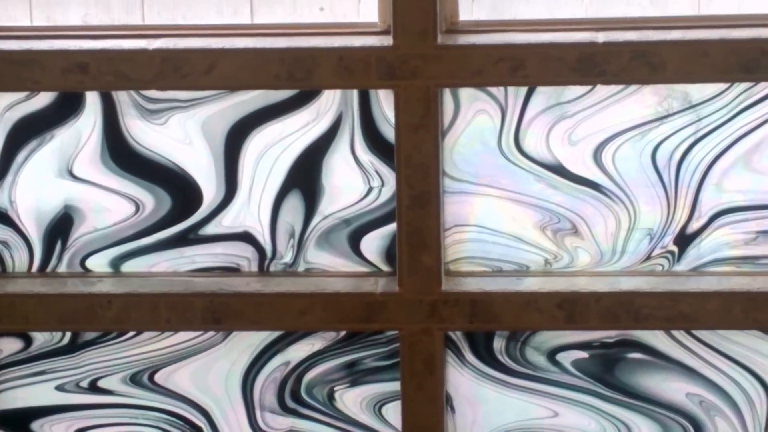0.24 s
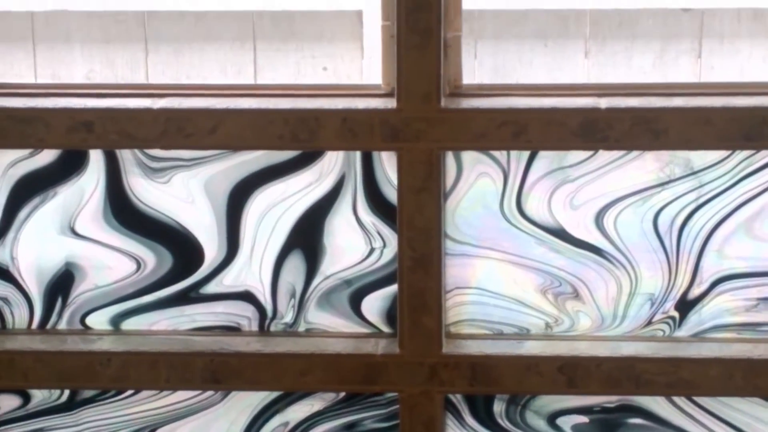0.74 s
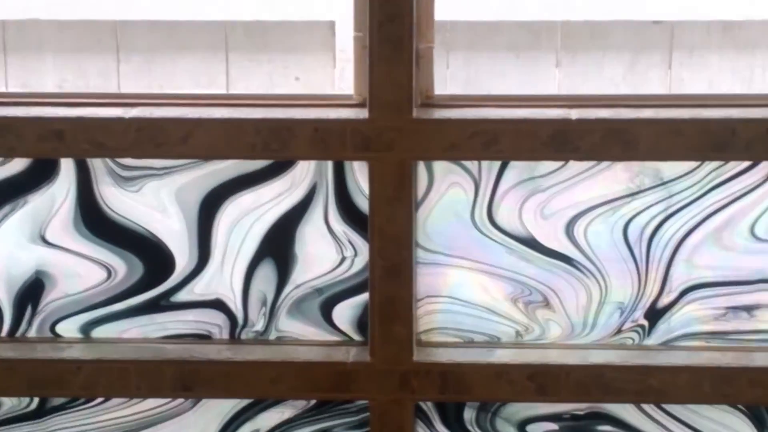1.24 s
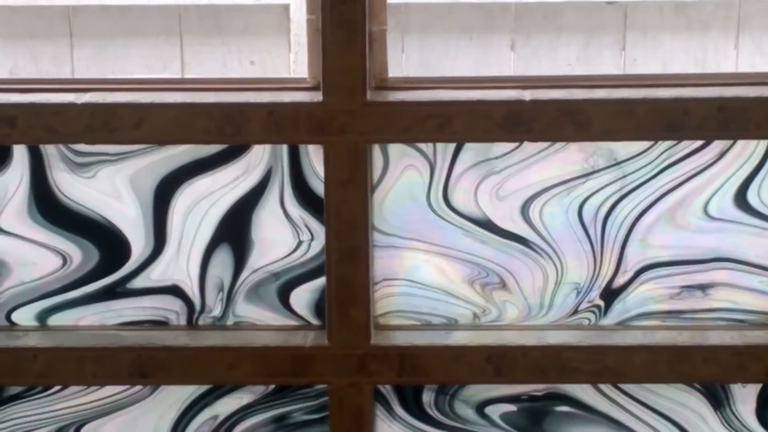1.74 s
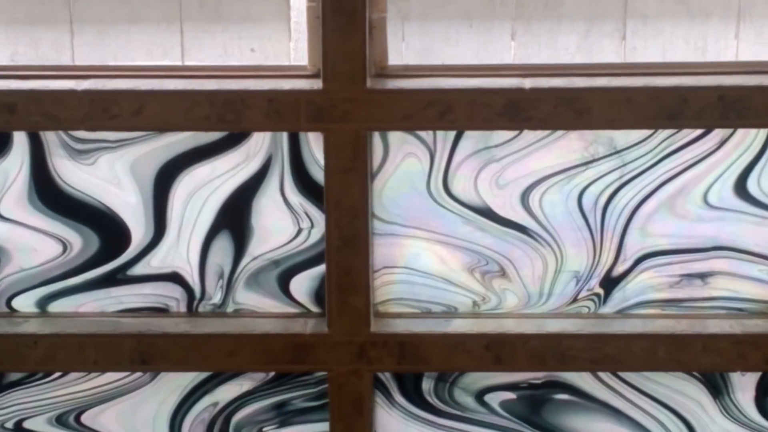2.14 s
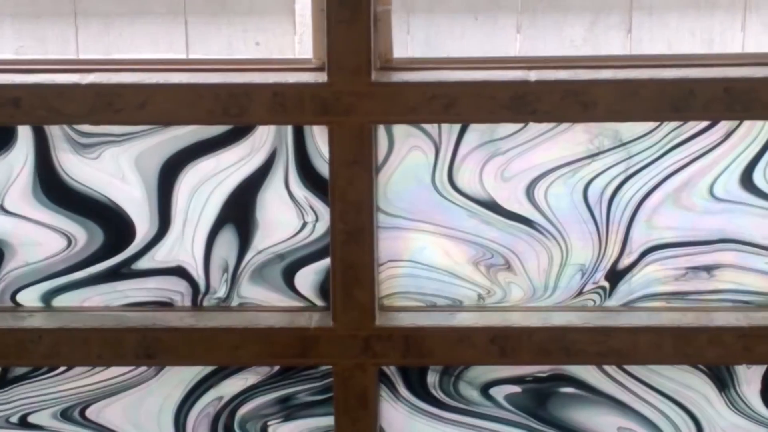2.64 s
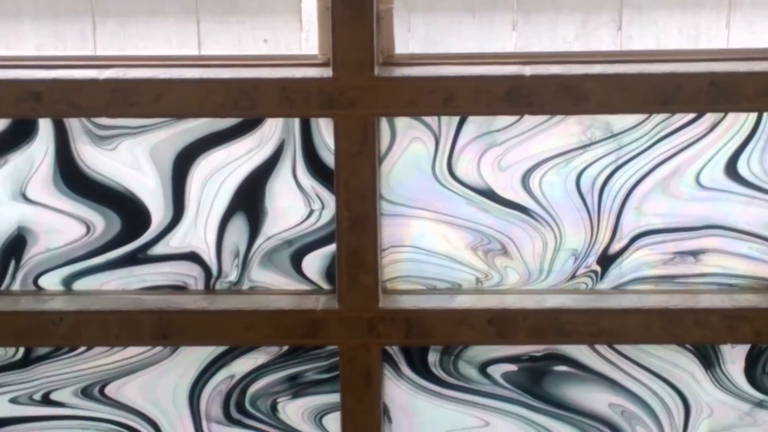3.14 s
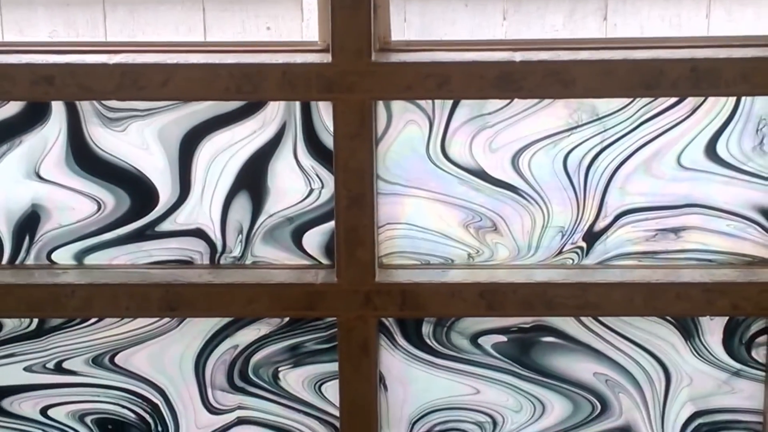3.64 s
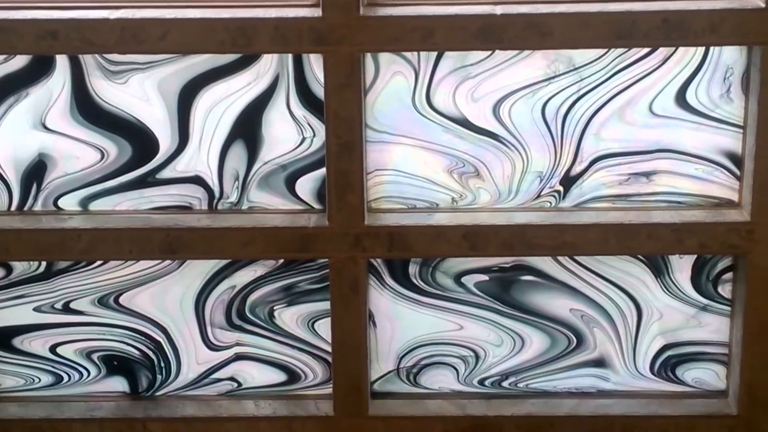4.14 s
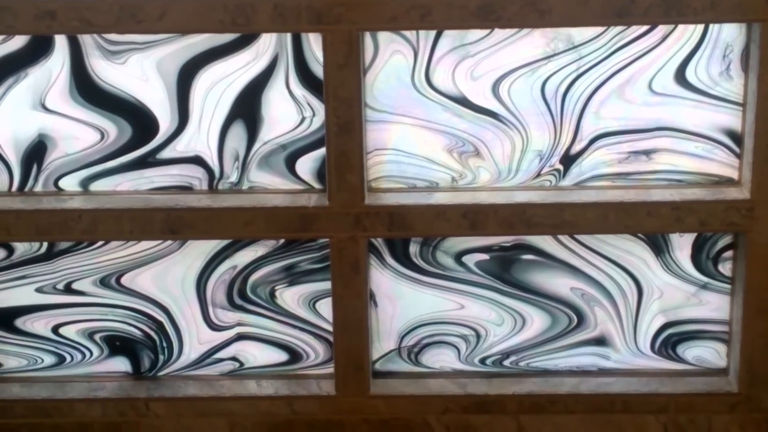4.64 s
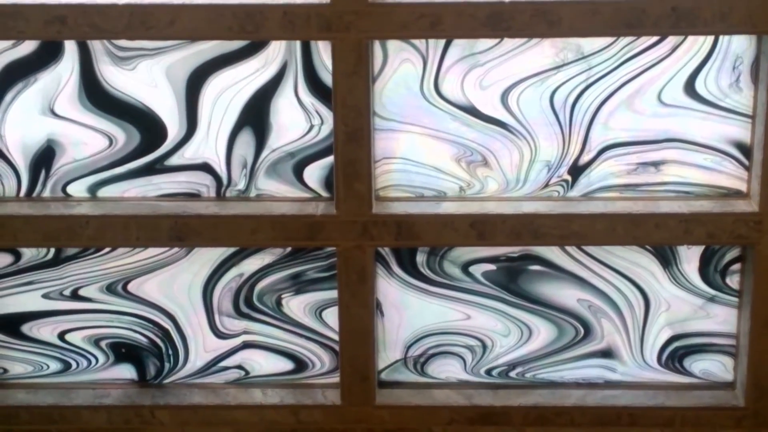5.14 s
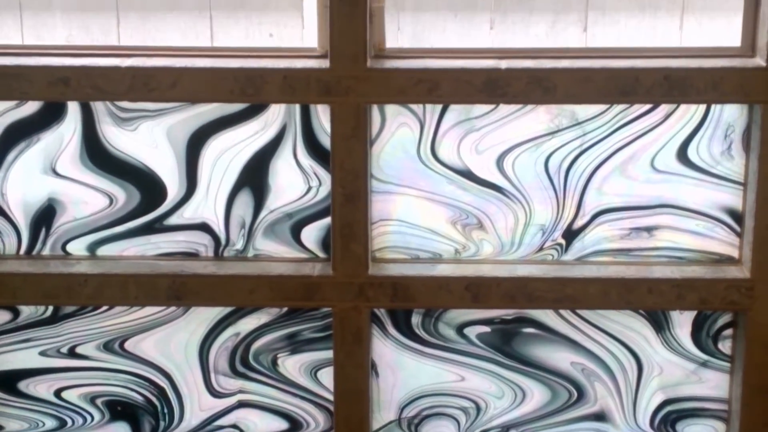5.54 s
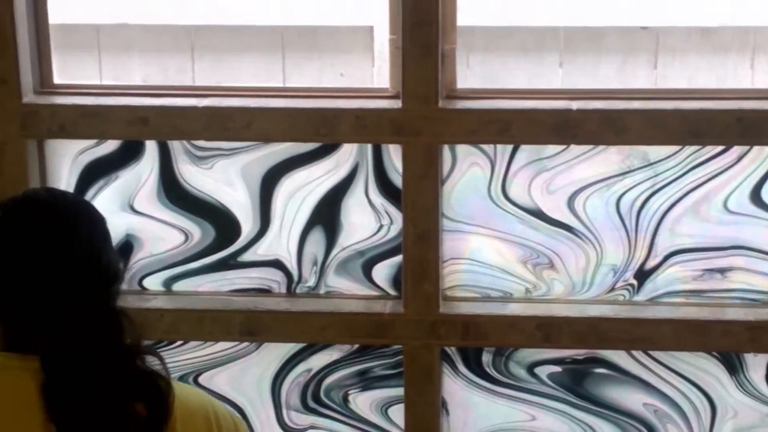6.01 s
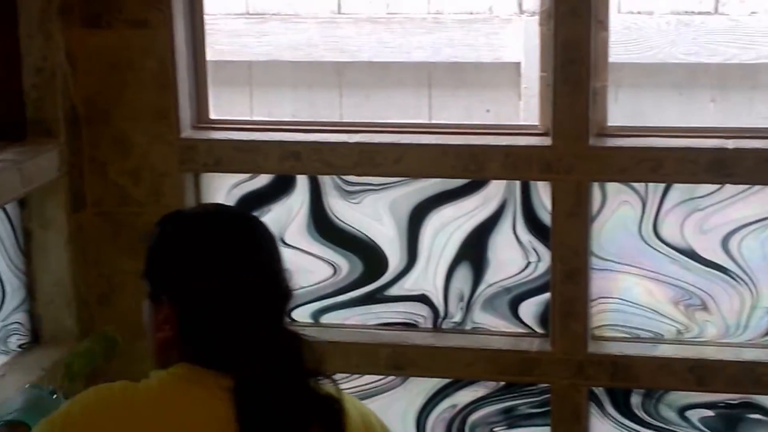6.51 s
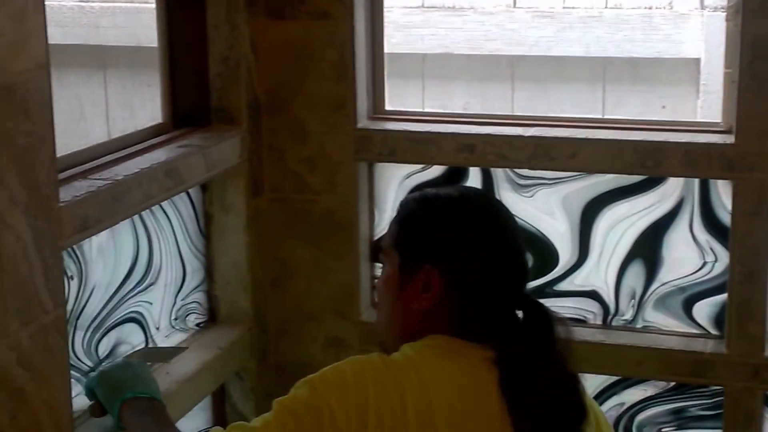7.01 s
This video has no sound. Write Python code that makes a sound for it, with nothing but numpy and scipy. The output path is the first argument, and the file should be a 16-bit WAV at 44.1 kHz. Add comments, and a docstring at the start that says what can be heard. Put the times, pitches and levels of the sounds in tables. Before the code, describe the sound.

A gloved hand rubs a cloth along a wooden window frame in short, uneven strokes, rasping and making the wood boom, with an occasional hollow bump. The rubbing grows stronger, then thins out. A pane drones briefly, two shuffling steps follow, and a hard tool knocks and skids on the sill with a short ring. One microphone picks it up in a bare room with a low hum and a few faint squeaks and whistles.

```python
"""A gloved hand rubs along a wooden window frame in a bare room, heard through one small microphone.
The cloth grips and slips, rasping and making frame and panes boom; now and then the hand bumps the wood.
A nudged pane drones, two shuffling steps follow, then a hard tool knocks and skids on the sill.
Under it all lie a low hum, quiet room air and a few faint squeaks and whistles."""
import sys
import numpy as np
from scipy import signal
from scipy.fft import rfft, irfft
from scipy.io import wavfile
from scipy.ndimage import uniform_filter1d

SR = 44100
rng = np.random.default_rng(int(sys.argv[2]) if len(sys.argv) > 2 else 0)


def master(y):
    """Save y as 16-bit WAV."""
    cut = np.clip(np.atleast_2d(y).T, -1, 1)
    pcm = np.round(cut * 32767)  # scale
    wavfile.write(sys.argv[1], SR, pcm.astype(np.int16))


N = 320607
TIME = np.arange(N) / SR
RING_TIME = np.arange(SR) / SR
GESTURE_TIME = np.arange(0, N / SR, .001)  # millisecond grid for envelopes


def gain_of(db):
    """Decibels to amplitude."""
    return 10 ** (np.asarray(db) / 20)


def unit_rms(x):
    """Scales to rms 1."""
    return x / np.sqrt(np.mean(x ** 2) + 1e-20)


def curve_at(points, hz):
    """Reads a curve on a log-frequency axis."""
    points_hz, values = np.transpose(points)
    return np.interp(np.log(hz + 1), np.log(points_hz + 1), values)


def add(mix, start, sound):
    """Mixes a sound in at a start time in seconds."""
    part = mix[max(round(start * SR), 0):][:len(sound)]
    part += sound[:len(part)]


def coloured(x, spectrum):
    """Shapes a signal with an EQ curve, at rms 1."""
    eq = gain_of(curve_at(spectrum, np.fft.rfftfreq(len(x), 1 / SR)))
    return unit_rms(irfft(rfft(x) * eq, len(x)))


def band(x, low_hz, high_hz):
    """One band of a signal, at rms 1."""
    edges = np.clip([low_hz, high_hz], 1, SR / 2 - 1)
    return unit_rms(signal.sosfilt(signal.butter(5, edges, "band", fs=SR, output="sos"), x))


def drift(rate_hz):
    """A smooth random wander, at rms 1."""
    lowpass = np.exp(-(np.fft.rfftfreq(N, 1 / SR) / rate_hz) ** 2)
    return unit_rms(irfft(rfft(rng.standard_normal(N)) * lowpass, N))


def resonate(x, hz, width_hz):
    """A resonance that sweeps along the curve hz."""
    carrier = np.exp(2j * np.pi * np.cumsum(hz) / SR)
    pole = np.exp(-np.pi * width_hz / SR)
    return unit_rms((carrier * signal.lfilter([1 - pole], [1, -pole], x / carrier)).real)


def decay(t60):
    """A one-second envelope that falls 60 dB every t60 seconds."""
    return np.exp(-np.log(1000) * RING_TIME / t60)


def grit(per_s, spread_db):
    """Tiny friction slips of uneven size, at random moments."""
    size = gain_of(spread_db * np.minimum(rng.exponential(1, N), 4))
    return unit_rms(size * rng.standard_normal(N) * (rng.random(N) < per_s / SR))


def slide_envelope(start, length, attack_s, fall_db_per_s, swell_db=0):
    """A sliding contact takes hold, ramps by swell_db over its length, then dies away."""
    since = np.maximum(GESTURE_TIME - start, 0)
    to_go, after = np.maximum(1 - since / length, 0), np.maximum(since - length, 0)
    return (1 - np.exp(-since / attack_s)) * gain_of(-swell_db * to_go - fall_db_per_s * after)


def summed_db(powers):
    """Level of overlapping contacts together, sample by sample."""
    return np.interp(TIME, GESTURE_TIME, 10 * np.log10(np.sum(powers, axis=0) + 1e-14))


def walls(x):
    """Near reflections and a diffuse tail; three patterns crossfade as the source travels."""
    out = np.zeros(N)
    for k in range(3):
        echoes = rng.standard_normal(SR) * (decay(0.16) + gain_of(9) * decay(0.01))
        crossfade = np.cos(np.pi * (1.6 * TIME + k / 3)) ** 3
        out += signal.fftconvolve(x * crossfade, echoes)[:N]
    return unit_rms(out)


# The bare room's reverb. Each row: frequency in Hz, t60 in seconds.
ROOM_DECAY = [(100, 0.88), (260, 0.52), (1000, 0.39), (2500, 0.56), (7000, 0.71), (14000, 0.2)]


def burst(spectrum, t60, room_db):
    """A short hit of noise with a room tail in which each band dies at its own speed."""
    direct = coloured(rng.standard_normal(SR), spectrum) * decay(t60)
    hz, t, bands = signal.stft(coloured(rng.standard_normal(SR), spectrum), SR, nperseg=512)
    fade = np.exp(-np.log(1000) * t / curve_at(ROOM_DECAY, hz)[:, None])
    tail = signal.istft(bands * fade, SR, nperseg=512)[1][:SR]
    return direct + gain_of(room_db) * tail


# The colour of the room air. Each row: frequency in Hz, EQ gain in dB.
AIR_EQ = [(20, -9.5), (90, -3), (130, -3.5), (220, -6), (380, -8.5), (600, -13), (900, -15), (1300, -17),
          (2000, -13.5), (2700, -17.5), (3600, -25), (7000, -23), (10000, -29), (15600, -27.5)]
# The hum's partials. Each row: frequency in Hz, relative level in dB.
HUM_PARTIALS = [(58.5, -2), (118.4, -6.5), (204.6, -18.5), (355.3, -20.5)]
# The fader ride on hum and rumble. Each row: time in seconds, relative level in dB.
LOW_END_RIDE = [(0, -59.5), (.42, -60.5), (.65, -66), (1.42, -55.5), (1.6, -53.5), (1.8, -62.5), (3.5, -61),
                (4.05, -65), (4.47, -63.5), (4.7, -60), (5.1, -61.5), (7.27, -62.5)]


def room_tone():
    """A bed of quiet air, low rumble and wavering hum."""
    air = gain_of(-61.5) * coloured(rng.standard_normal(N), AIR_EQ) * gain_of(.5 * drift(11))
    hum = sum(gain_of(db + 3 * drift(5)) * np.sin(2 * np.pi * hz * TIME + 0.41 * drift(7.5))
              for hz, db in HUM_PARTIALS)
    rumble = gain_of(-0.5) * band(rng.standard_normal(N), 12, 78.5)
    ride_db = np.interp(TIME, *np.transpose(LOW_END_RIDE)) + 4
    return air + (hum + rumble) * gain_of(ride_db)


# Thin far-off whistles, perhaps a bird.
# Each row: start and length in seconds, level in dB, first and last pitch in Hz.
WHISTLE_GLIDES = [(5.1, .12, -71, 7850, 8150), (5.368, 0.45, -68.5, 6650, 6600),
                  (7.12, .2, -71, 6550, 7600)]


def whistles():
    """Faint high glides, blurred by a quick quaver."""
    out = np.zeros(N)
    quaver = 1 + .012 * drift(140)
    for start, length, db, first_hz, last_hz in WHISTLE_GLIDES:
        progress = np.clip((TIME - start) / length, 0, 1)
        hz = (first_hz + (last_hz - first_hz) * progress) * quaver
        out += gain_of(db) * np.sin(np.pi * progress) * np.sin(2 * np.pi * np.cumsum(hz) / SR)
    return out


# Faint distant squeaks. Each row: start in seconds, length in seconds, level in dB.
SQUEAK_CUES = [(0.036, 0.042, -60.5), (0.107, 0.057, -61.5), (0.208, 0.048, -61.5), (6.293, 0.091, -67)]


def squeaks(pitch_hz=910):
    """Soft, pure squeaks that swell and fade on one pitch."""
    out = np.zeros(N)
    for start, length, db in SQUEAK_CUES:
        t = np.arange(0, length, 1 / SR)
        add(out, start, gain_of(db) * np.sin(np.pi * t / length) * np.sin(2 * np.pi * pitch_hz * t))
    return out


# A soft nudge on a pane. Each row: start in seconds, level in dB, pitch in Hz, t60 in seconds.
PANE_NUDGES = [(4.607, -45, 120, 0.88)]


def pane():
    """A loose pane drones in one low mode, dying slowly."""
    out = np.zeros(N)
    for start, db, hz, t60 in PANE_NUDGES:
        add(out, start, gain_of(db) * decay(t60) * np.sin(2 * np.pi * hz * RING_TIME))
    return out


# Dull footfalls and handling thuds. Each row: start in seconds, level in dB, nominal pitch in Hz.
THUD_CUES = [(0.668, -33, 110), (1.534, -32, 90), (4.613, -30.5, 141), (5.203, -23.5, 165),
             (5.22, -27, 190), (5.268, -42, 139), (5.453, -38, 214.5), (5.569, -26.5, 212),
             (5.855, -26.5, 164)]
# The colour of a sole on the floor. Each row: frequency in Hz, EQ gain in dB.
SOLE_EQ = [(24, -34), (40, -8), (64, 6), (87, -16), (235, 0.5), (280, -7.5), (317, -5.5), (480, -17),
           (562, -23), (758, -21.5), (1350, -25), (1490, -21), (1910, -13.5), (3840, -28.5), (6810, -23),
           (15500, -43)]
# Scuffs. Each row: start in seconds, floorboard rumble in dB, hiss in dB, length in seconds.
SCUFF_CUES = [(5.196, -37, -41.5, 0.034), (5.561, -41, -46.5, 0.035)]


def steps():
    """Dead thuds sag in pitch; under a scuff the boards rumble and fade while the sole hisses on."""
    out = np.zeros(N)
    attack = 1 - np.exp(-RING_TIME / 0.00074)
    for start, db, hz in THUD_CUES:
        cycles = hz * 0.012 * np.log1p(RING_TIME / 0.01)
        add(out, start, gain_of(db) * np.sin(2 * np.pi * cycles) * decay(0.016) * attack)
    sole = coloured(walls(grit(per_s=4500, spread_db=2.5)), SOLE_EQ)
    boards, hiss = band(sole, 36, 610), band(sole, 580, 16000)
    for start, boards_db, hiss_db, length in SCUFF_CUES:
        since = np.maximum(TIME - start, 0)
        slide = (1 - np.exp(-since / 0.017)) * np.exp(-np.maximum(since - length, 0) / 0.06)
        shake = (1 - np.exp(-since / 0.0097)) * np.exp(-since / 0.078)
        out += shake * gain_of(boards_db) * boards + slide * gain_of(hiss_db) * hiss
    return out


# The bright ring of the tool's edge. Each row: frequency in Hz, width in Hz, relative level in dB.
EDGE_MODES = [(3800, 180, 3), (4380, 100, -3), (5100, 160, -4), (6060, 150, -4.5), (6670, 55, 0),
              (7100, 69, 3), (7680, 150, -1), (8350, 120, -4), (10800, 91, -4.5), (13200, 350, -4)]
# Skids on the sill. Each row: start in seconds, length in seconds, level in dB.
SKID_CUES = [(6.445, .012, -47.5), (6.531, 0.052, -48.5), (6.724, 0.06, -63.5)]


def tool_skids():
    """The tool's edge chatters over the wood and sings in its broad high resonances."""
    ring = sum(gain_of(db) * np.sqrt(width) * np.cos(2 * np.pi * hz * RING_TIME)
               * np.exp(-np.pi * width * RING_TIME) for hz, width, db in EDGE_MODES)
    slips = grit(per_s=2500, spread_db=1)
    chatter = band(signal.fftconvolve(slips, ring)[:N], 3200, 20000)
    powers = [(gain_of(db) * slide_envelope(start, length, attack_s=0.0039, fall_db_per_s=188)) ** 2
              for start, length, db in SKID_CUES]
    return chatter * gain_of(summed_db(powers))


# The colour of the tool's clack. Each row: frequency in Hz, EQ gain in dB.
CLACK_EQ = [(71, -75), (120, -32), (200, -13), (312, -0.5), (353, -11), (509, -9.5), (1020, 1), (1220, -22),
            (1380, 4.5), (1650, -6.5), (2440, -7.5), (2640, -4), (2920, -13), (5610, -26.5), (15500, -30)]
# The tool's ring. Each row: frequency in Hz, relative level in dB, t60 in seconds.
TOOL_MODES = [(324, -23, 0.65), (790, -31, 0.16), (867, -20, 0.34), (1010, -11, 0.07), (1414, -7, 0.17),
              (1399, -17, 0.26), (1550, -16, 0.35), (1800, -18, 0.4), (1843, -11, 0.26), (1997, -13.5, 0.4),
              (2250, -10, 0.24), (2530, -17, 0.31), (2647, 0.5, 0.15), (2600, -14, 0.31), (3020, -21, .25),
              (4060, -14.5, 0.15), (4420, -13, 0.081)]
# Hits on the sill. Each row: start in seconds, clack in dB, ring in dB.
KNOCK_CUES = [(6.454, -31, -41), (6.458, -28.5, -41), (6.466, -32.5, -27.5), (6.475, -37, -29),
              (6.499, -42, -49), (6.545, -39.5, -40), (6.738, -68, -51.5), (6.768, -64, -54.5)]


def tool_knocks():
    """A hard tool rattles on the sill; each contact clacks and rings at a slightly different pitch."""
    out = np.zeros(N)
    for start, clack_db, ring_db in KNOCK_CUES:
        detunes = 1 + .008 * rng.standard_normal(len(TOOL_MODES))
        phases = rng.random(len(TOOL_MODES))
        ring = sum(gain_of(db) * decay(t60) * np.sin(2 * np.pi * (hz * detune * RING_TIME + phase))
                   for (hz, db, t60), detune, phase in zip(TOOL_MODES, detunes, phases))
        clack = burst(CLACK_EQ, t60=0.035, room_db=-3.5)
        add(out, start, gain_of(clack_db) * clack + gain_of(ring_db) * ring)
    return out


# The body of frame and panes. Each row: frequency in Hz, relative level in dB, base t60 in seconds.
FRAME_MODES = [(119, -18, .4), (180, -6, .17), (193, -2, .24), (206, -5, .17), (245, -3.5, .26),
               (319, -16, .25), (354, -17, .3), (467, -16, .4), (764, -15, .38), (791, -17, .2),
               (870, -15, .15), (972, -13, .35), (1140, -9, .4), (1169, -12, .38), (1310, -14, .2),
               (1341, -11, .25), (1378, -12, .2), (1593, -17, .2), (1744, -16, .2), (1943, -13, .25),
               (1992, -13, .25), (2030, -12, .25), (2492, -17, .2)]


def frame_ring(damping, top_hz):
    """The frame rings from one push: longer with less damping, its modes rolling off above top_hz."""
    return sum(gain_of(db) / np.hypot(1, hz / top_hz) * np.cos(2 * np.pi * hz * RING_TIME)
               * decay(t60 / damping) for hz, db, t60 in FRAME_MODES)


# The colour of a hollow tap. Each row: frequency in Hz, EQ gain in dB.
TAP_EQ = [(59, -39), (100, -17), (173, -20), (300, -16), (390, -3), (480, -11.5), (977, -18), (1160, -25),
          (1290, -72), (2130, -11.5), (2320, -18), (15500, -54)]
# The hand bumps the frame. Each row: start in seconds, boom in dB, tap in dB.
BUMP_CUES = [(0.456, -48, -49), (0.723, -64, -53), (0.73, -36.5, -46), (0.778, -48, -43.5),
             (1.088, -46.5, -50.5), (1.198, -41, -60), (1.617, -53, -52.5), (1.96, -26.5, -58),
             (2.192, -24.5, -40), (2.858, -34, -38), (3.592, -53.5, -68)]
# Crumbs under the hand. Each row: start in seconds, level in dB, tone in Hz (higher for smaller crumbs).
CRUMB_CUES = [(0.45, -47, 4850), (0.723, -45, 5160), (3.835, -48, 1000), (4.143, -43.5, 1670),
              (5.271, -37, 2230)]


def hand_bumps():
    """The padded hand lands: the frame booms under a hollow tap; now and then a crumb snaps."""
    out = np.zeros(N)
    soft_attack = 1 - np.exp(-RING_TIME / 0.0035)
    for start, boom_db, tap_db in BUMP_CUES:
        add(out, start, gain_of(boom_db) * soft_attack * frame_ring(damping=0.62, top_hz=450))
        add(out, start, gain_of(tap_db) * burst(TAP_EQ, t60=0.062, room_db=-6))
    for start, db, hz in CRUMB_CUES:
        snap_eq = [(hz / 4, -24), (hz / 2, 0), (hz * 1.07, 0), (hz * 2, -16), (hz * 6, -32)]
        add(out, start, gain_of(db) * burst(snap_eq, t60=0.023, room_db=-13))
    return out


def stroke_powers(strokes, levels_db, fall_db_per_s, grip_s=0.0094):
    """Power of each stroke over time in one layer; the cloth trails on lightly afterwards."""
    powers = []
    for (start, length, swell_db, *_), db in zip(strokes, levels_db):
        stroke = slide_envelope(start, length, grip_s, fall_db_per_s, swell_db)
        trail = gain_of(-35) * slide_envelope(start, length, grip_s, fall_db_per_s=69, swell_db=swell_db)
        powers.append(gain_of(db) ** 2 * (stroke ** 2 + trail ** 2))
    return np.array(powers) + 1e-14


# The colour of cloth on wood. Each row: frequency in Hz, EQ gain in dB.
FRICTION_EQ = [(60, -36), (100, -37), (170, 7), (330, 9), (560, -4.5), (850, 0.5), (1300, -1), (2100, -2),
               (2700, -0.5), (3300, -11.5), (4500, -15), (7400, -13.5), (10000, -23), (15500, -31.5)]
# Strokes of the glove. Each row: start and length in seconds, swell over the stroke in dB,
# faders in dB for frame boom, rasp and fine-grit fizz, centre of the rasp in Hz.
GLOVE_STROKES = [ (0.401, 0.028, -1, -52, -57, -67, 1500), (0.44, 0.025, -2, -45.5, -45.5, -53.5, 1400),
                 (0.721, 0.056, -4, -38.5, -49.5, -57.5, 1120), (0.867, .12, 5, -67, -62.5, -63, 1700),
                 (1.079, .065, 3, -46.5, -51.5, -60, 756), (1.18, 0.12, -2, -44, -46, -55, 1550),
                 (1.373, 0.11, -5, -61, -63, -73, 1450), (1.598, 0.12, 0, -48.5, -53, -58, 1120),
                 (1.717, 0.053, 0.5, -44, -39, -45, 2040), (1.853, .05, 6, -58, -51, -59.5, 2050),
                 (1.901, 0.08, 7, -35.5, -36, -41, 1710), (1.985, 0.068, 2, -31, -33, -39, 1840),
                 (2.09, 0.033, -1, -47, -39.5, -46, 1200), (2.17, 0.061, 5, -31, -44.5, -42.5, 1320),
                 (2.218, 0.13, 3.5, -28, -30, -40, 1170), (2.328, 0.066, 6, -38, -34.5, -36.5, 1250),
                 (2.395, 0.039, 1.5, -31, -31, -46, 1365), (2.698, 0.13, 16, -74, -49, -51.5, 1930),
                 (2.813, 0.1, 11, -36, -35, -47.5, 1050), (3.118, 0.14, 0.5, -66, -60.5, -61.5, 2420),
                 (3.344, 0.33, -1.5, -62.5, -65, -65.5, 1920), (3.711, 0.018, 5, -50, -49.5, -55.5, 1450),
                 (4.028, 0.15, 9, -67, -55, -61.5, 1510), (4.2, 0.13, -4.5, -68, -62.5, -68.5, 2300),
                 (4.422, 0.03, 3, -68, -64, -67, 1660), (4.605, .10, 2.5, -59.5, -63.5, -65, 1500),
                 (4.737, 0.1, 4.5, -64, -55, -57.5, 1920), ]


def glove_rubbing():
    """Slips under the hand drive the frame: pressure makes it boom, sliding makes it rasp and fizz."""
    *_, booms_db, rasps_db, fizzes_db, centres_hz = np.transpose(GLOVE_STROKES)
    rasp_powers = stroke_powers(GLOVE_STROKES, rasps_db, fall_db_per_s=134)
    rasp_db = summed_db(rasp_powers)
    boom_db = summed_db(stroke_powers(GLOVE_STROKES, booms_db, fall_db_per_s=103))
    fizz_db = summed_db(stroke_powers(GLOVE_STROKES, fizzes_db, fall_db_per_s=146))

    slips = grit(per_s=4400, spread_db=1.5) * gain_of(0.42 * drift(55))  # the hand catches and lets go
    friction = coloured(walls(slips), FRICTION_EQ)
    wood = unit_rms(signal.fftconvolve(slips, frame_ring(damping=0.91, top_hz=9000))[:N])

    brush_db = np.clip(-.5 * (boom_db + 59), -6, 8) - 4  # a light touch brushes; a firm one rings
    boom = band(wood + gain_of(brush_db) * friction, 109, 466)
    boom /= np.sqrt(uniform_filter1d(boom ** 2, size=2200) + 0.63)  # steady pressure evens the judder

    # The strongest stroke dominates the colour of the rasp.
    centre_hz = np.interp(TIME, GESTURE_TIME, centres_hz @ rasp_powers / rasp_powers.sum(0))
    rasp = band(friction + gain_of(-10) * wood, 466, 2810)
    rasp = unit_rms(rasp + gain_of(-4) * resonate(rasp, centre_hz, width_hz=1100))

    top_db = np.clip(0.44 * (fizz_db + 46), -6, 4) + 1  # fast strokes are brighter
    fizz = unit_rms(band(friction, 2890, 7600) + gain_of(top_db) * band(friction, 7620, 23000))
    return boom * gain_of(boom_db) + rasp * gain_of(rasp_db) + fizz * gain_of(fizz_db)


def scene():
    """One microphone feeds the whole mix to both channels."""
    window = glove_rubbing() + hand_bumps() + pane() + tool_knocks() + tool_skids()
    mix = window + steps() + room_tone() + squeaks() + whistles()
    return np.tile(mix, (2, 1))


def record(dry):
    """A steep low-pass trims the very top of the treble."""
    lowpass = signal.firwin(801, cutoff=15750, window=("kaiser", 9), fs=SR)
    return signal.oaconvolve(dry, lowpass[None], "same")


dry = scene()
out = record(dry)
master(out)
```